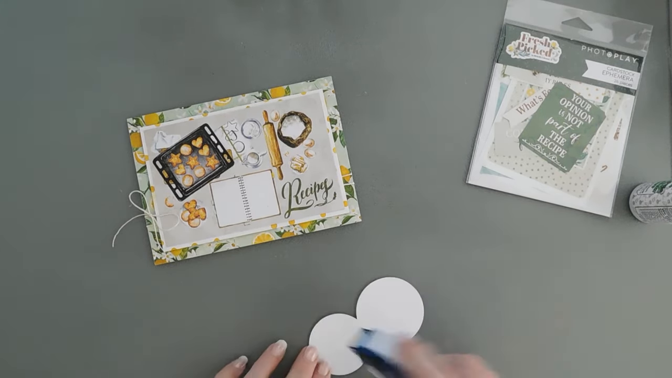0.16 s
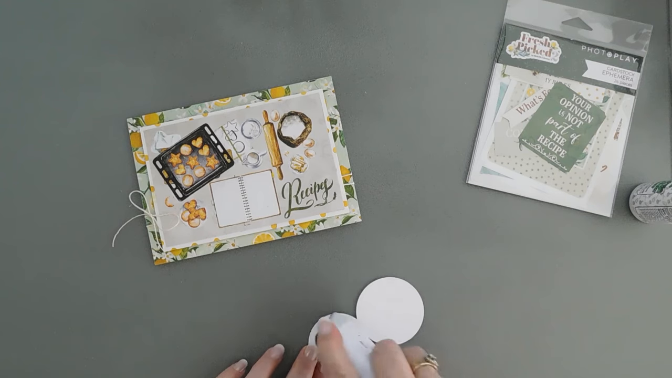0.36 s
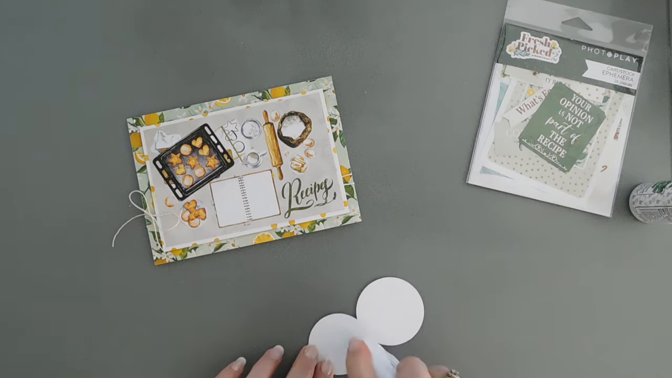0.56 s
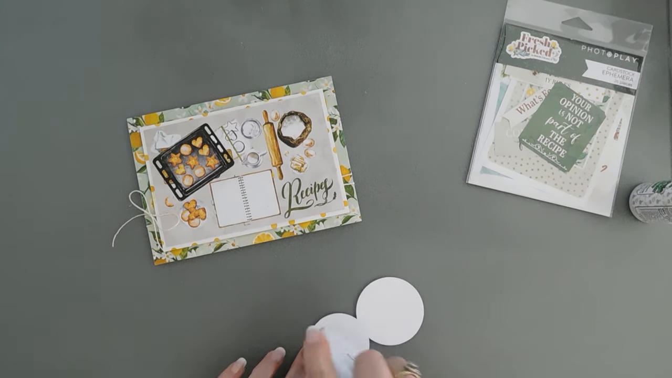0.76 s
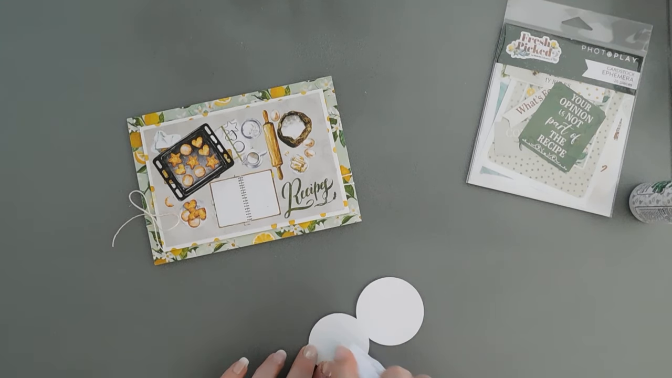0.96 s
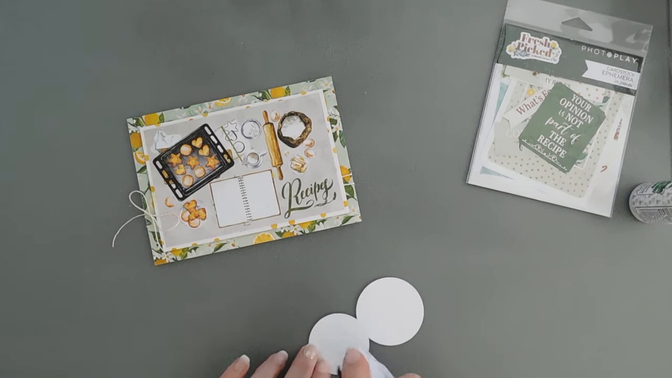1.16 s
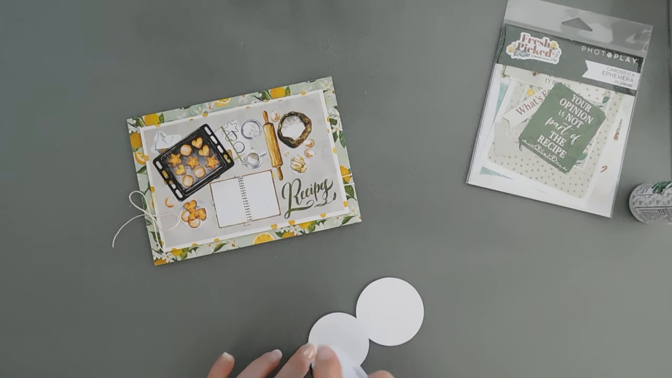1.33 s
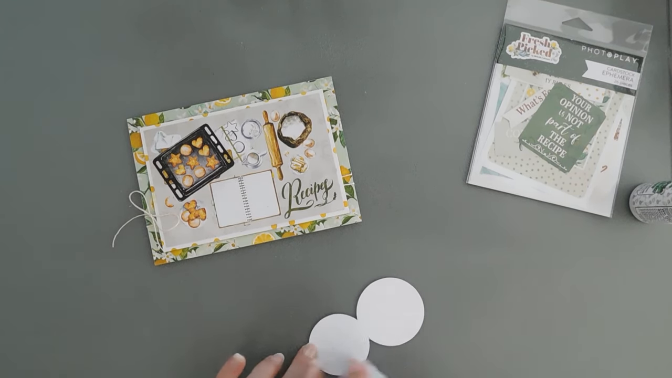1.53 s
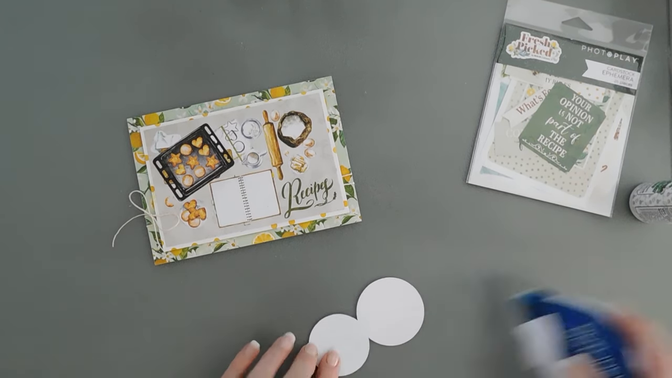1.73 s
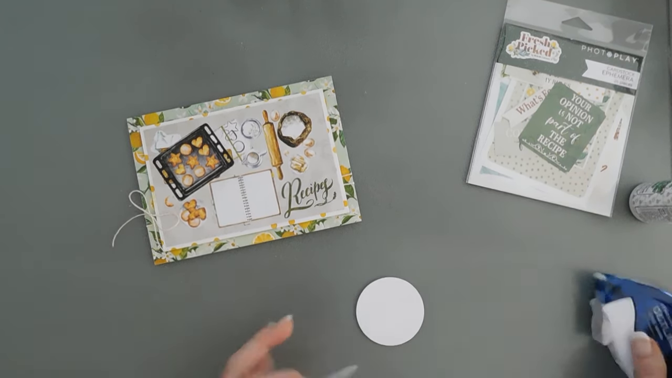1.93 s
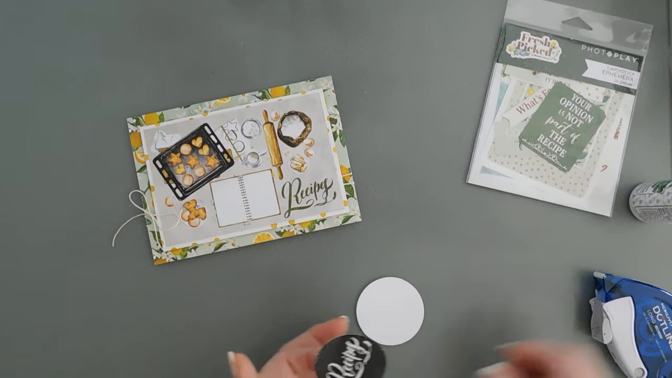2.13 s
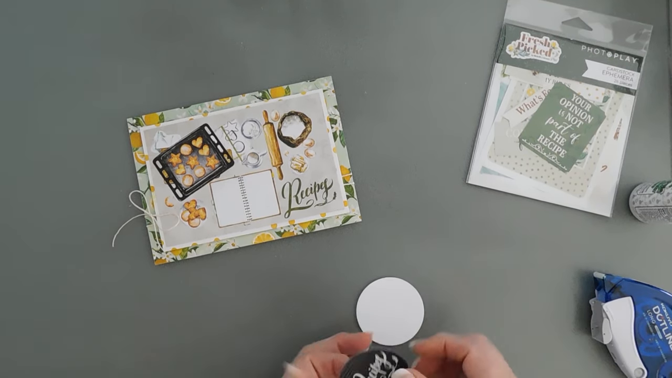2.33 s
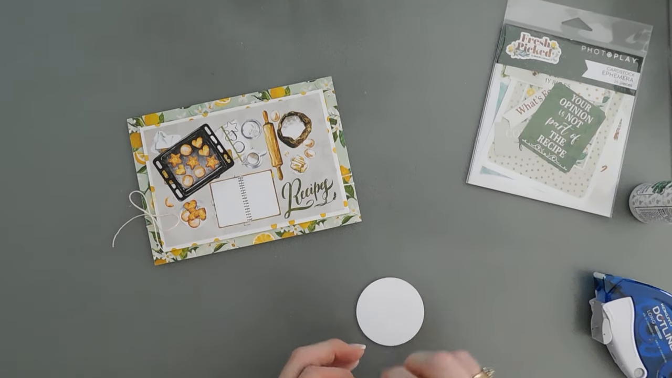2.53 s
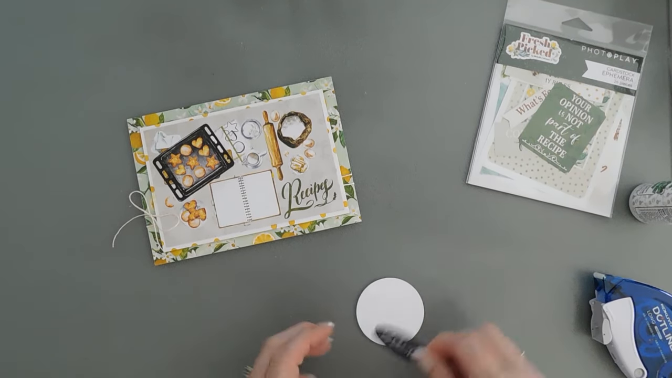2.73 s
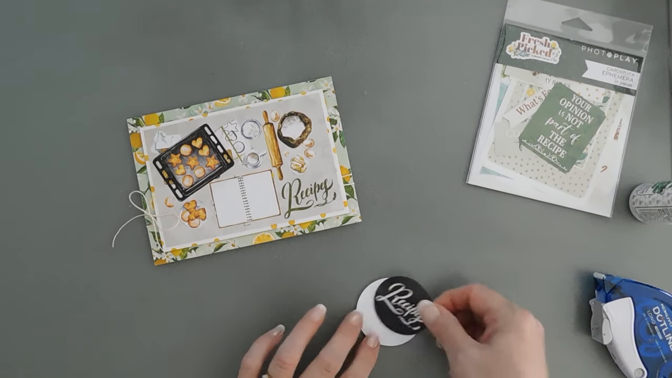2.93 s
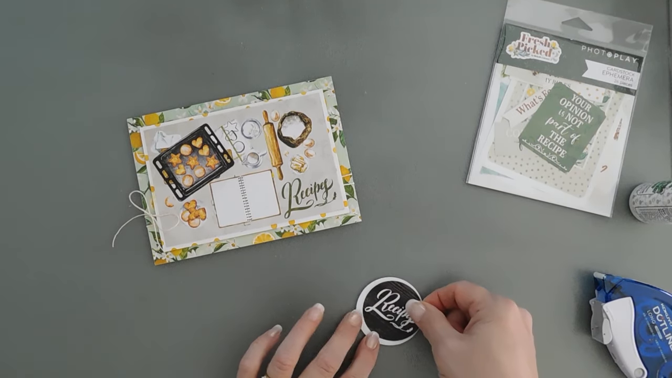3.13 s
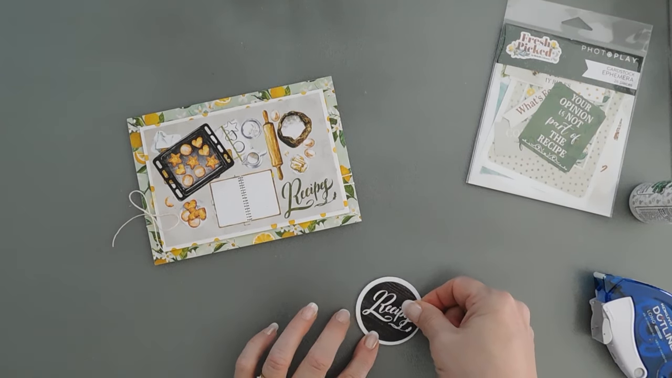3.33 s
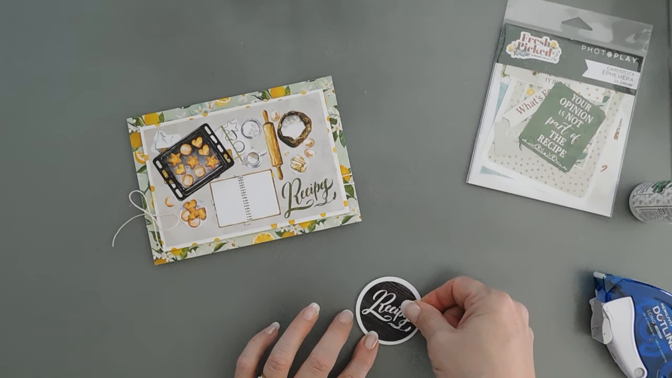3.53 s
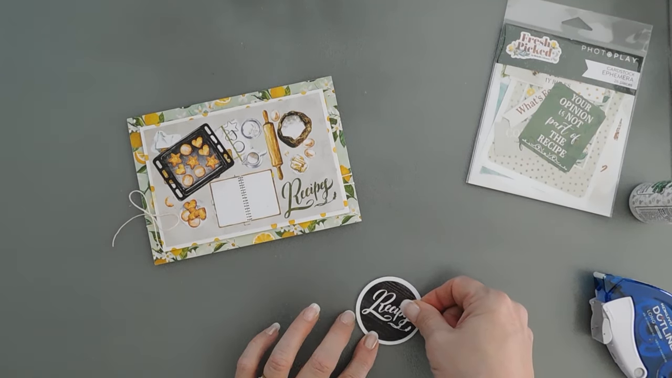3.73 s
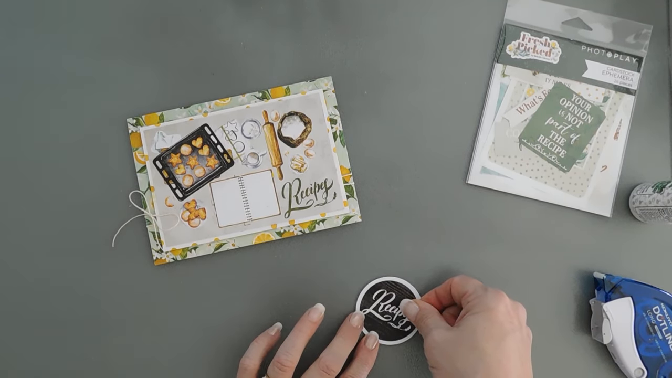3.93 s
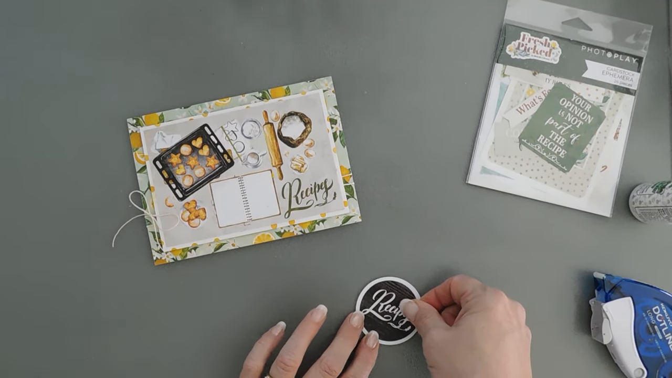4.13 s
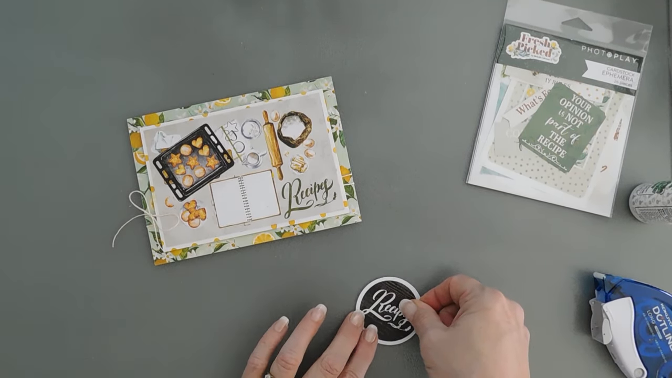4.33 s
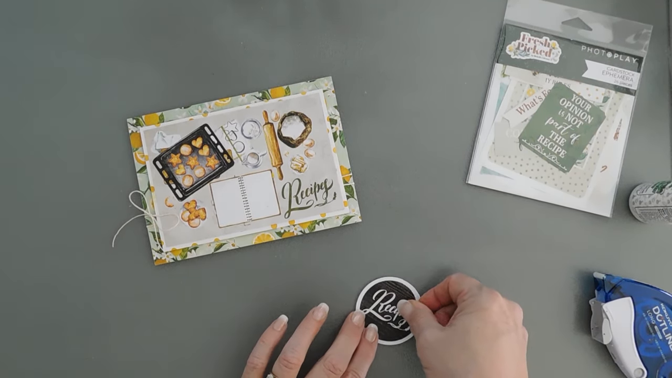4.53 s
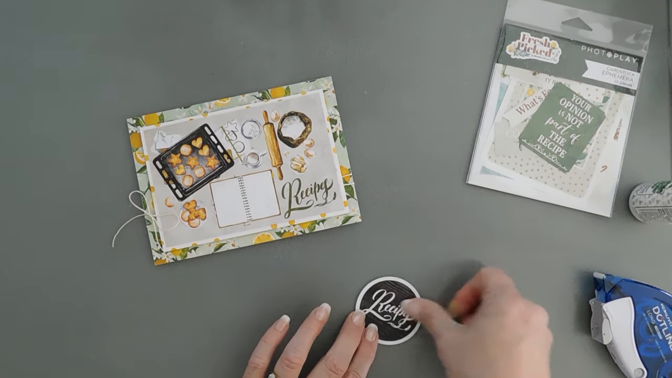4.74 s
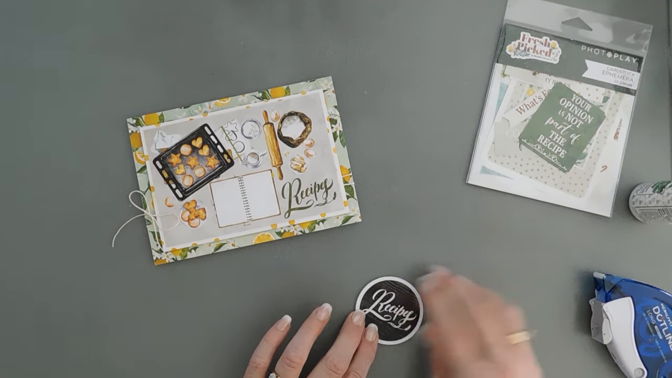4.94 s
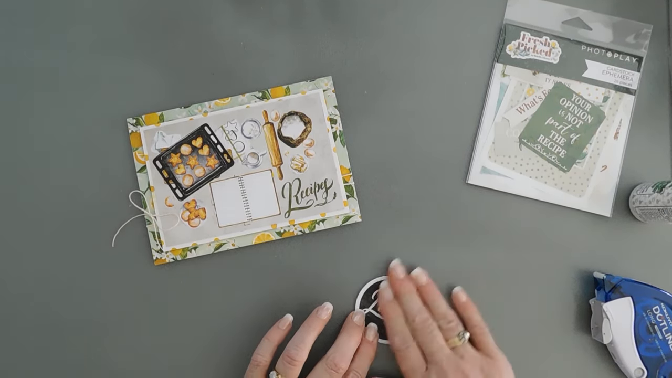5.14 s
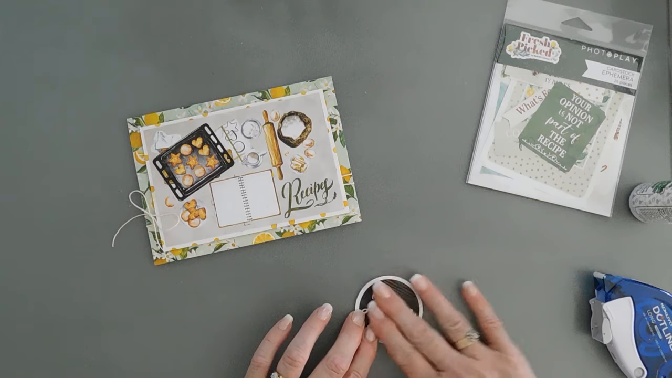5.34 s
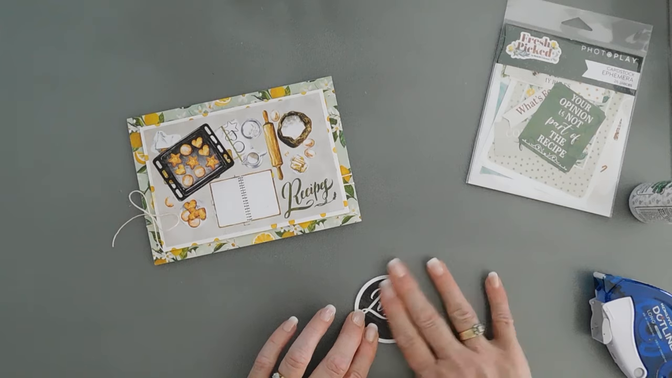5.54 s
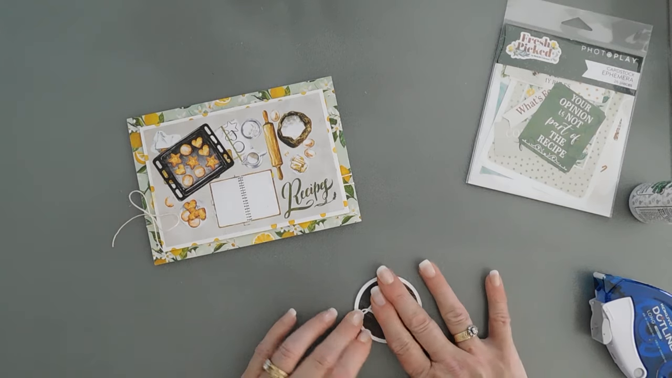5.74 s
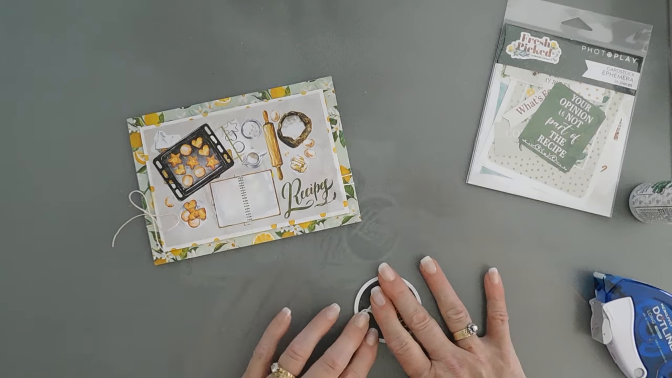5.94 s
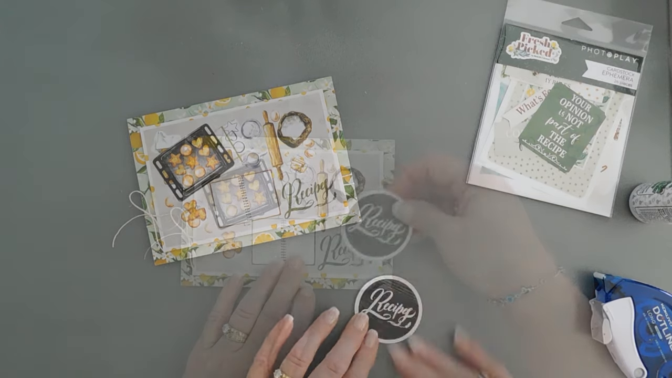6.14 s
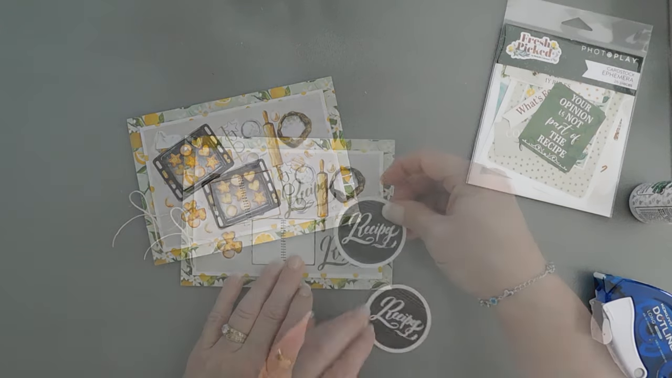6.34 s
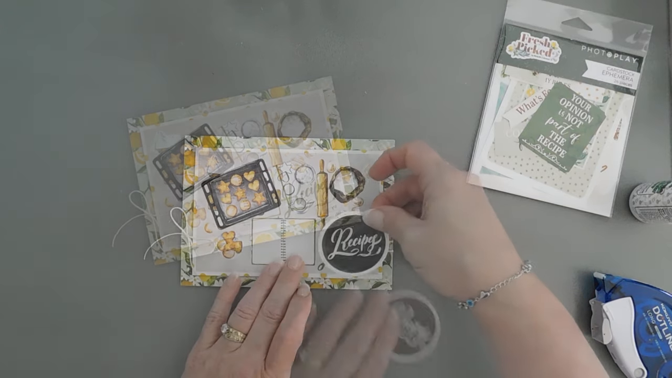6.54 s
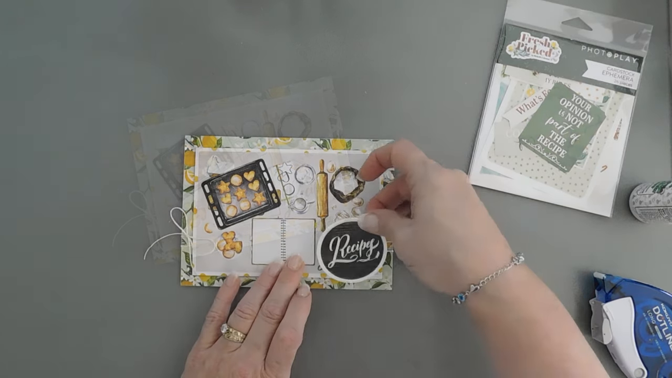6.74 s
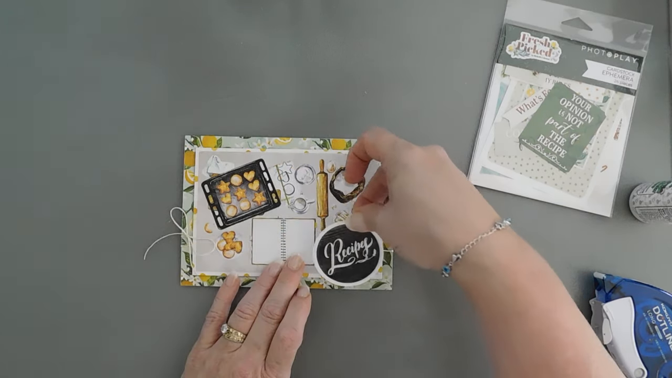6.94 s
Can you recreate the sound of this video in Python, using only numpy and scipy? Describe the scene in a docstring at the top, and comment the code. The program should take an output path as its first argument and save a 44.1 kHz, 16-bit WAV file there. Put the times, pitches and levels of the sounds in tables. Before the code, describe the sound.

Three brief, clicky strokes of an adhesive roller and a sharp knock on a table, followed by faint paper taps and rubbing.

```python
"""Craft table in a small quiet room. A plastic tape runner is picked up, drawn over card in three short
strokes and dropped: knocks ring its shell and thud the table, gears whirr, glue peels off its carrier.
Card pieces are then lifted, tapped, smoothed and laid down: damped taps, slipping fibres, finger squeaks.
Short reflections, air noise and a faint appliance hum lie behind."""
import sys
import numpy as np
from scipy import signal
from scipy.fft import rfft, irfft, next_fast_len
from scipy.io import wavfile
from scipy.ndimage import uniform_filter1d, map_coordinates

SR = 44100
rng = np.random.default_rng(int(sys.argv[2]) if len(sys.argv) > 2 else 0)


def store_wav(level_fs):
    """Save 16-bit WAV to argv[1]."""
    pcm = np.round(np.clip(np.atleast_2d(level_fs), -1, 1) * 32767)
    wavfile.write(sys.argv[1], SR, pcm.T.astype(np.int16))


N = 312777
TIME_S = np.arange(N) / SR
HIT_SAMPLES = 4096

# plastic shell modes: f/Hz, width/Hz, level/dB
SHELL_MODES = [(713, 17, -19.5), (650, 30, -10.5), (833, 73, -0.5), (834, 100, -2), (918, 120, -0.5),
               (1178, 57, 1.5), (1358, 36, -8.5), (1477, 52, -1.5), (1557, 59, -7.5), (1628, 37, -7),
               (1664, 120, -5.5), (1840, 40, -10), (2022, 29, -6), (2175, 90, -1.5), (2208, 150, -1),
               (2553, 130, -7.5), (2725, 140, -7.5), (2850, 120, -10), (3008, 42, -6.5), (3274, 140, -1),
               (3352, 240, -3), (3904, 268, -7.5), (3970, 200, -10), (4580, 620, -16)]
# card sheet spectrum: f/Hz, level/dB
SHEET_SPECTRUM = [(250, -24), (600, -3.5), (1000, -4.5), (1500, 0.5), (2800, -6), (4200, -4.5), (6000, -20),
                  (10000, -37)]
# paper fibre spectrum: f/Hz, level/dB
FIBRE_SPECTRUM = [(1500, -24), (3500, -2), (5000, 3.5), (6500, 3.5), (8500, 6.5), (11500, 7.5), (16000, 3)]


def runner_knocks():
    """Each knock thuds the table once; the shell rebounds twice, weaker and duller each time."""
    # shell and trigger knocks: t/s, ring/dB, ring centre/Hz, snap/dB, thud/dB, loss per rebound/dB
    knocks = [(0.0687, -54, 1890, -45.5, -58, 20), (0.082, -43, 2100, -59, -66, 20),
              (0.1273, -28, 2020, -32, -51.5, 30), (0.2807, -44, 2870, -58.5, -66, 28),
              (0.4134, -28, 1880, -40.5, -43, 5.5), (0.477, -31, 2720, -40, -58, 23),
              (0.505, -33, 1870, -51, -55.5, 25), (0.519, -26, 2830, -25, -59.5, 18),
              (0.6472, -31, 2050, -37, -52.5, 10), (0.853, -32, 2360, -45, -46.5, 2),
              (0.8629, -21, 2730, -29.5, -32.5, 2.5), (0.9105, -22.5, 2980, -30, -58.5, 30),
              (1.131, -44, 3540, -45, -74, 3), (1.1743, -40, 3100, -69, -77, 21),
              (1.4616, -21, 2570, -31, -34, 2), (1.5074, -30.5, 1880, -56, -57.5, 17),
              (1.527, -33, 2980, -41, -67.5, 10.5), (1.692, -49, 2770, -44, -58.5, 5),
              (1.8863, -13.5, 2150, -24.5, -43.5, 8.5), (1.907, -26.5, 1770, -27, -43, 9.5),
              (1.93, -23, 1900, -27.5, -44, 12.5), (1.9764, -20.5, 1800, -31.5, -42.5, 7),
              (2.003, -7.5, 1947, -10, -26.5, 9)]
    # runner position: t/s, left lead/samples, table low cut/Hz
    places = [(0.13, 2.5, 100), (0.4, 2.5, 85), (1.55, -1.5, 85), (1.85, 2.5, 200)]
    rebound_s, dulling_db = .0058, 7
    place_s, leads, low_cuts_hz = np.transpose(places)
    out = np.zeros((2, N))
    for s, ring_db, centre_hz, snap_db, thud_db, loss_db in knocks:
        lead = np.interp(s, place_s, leads)
        thud = from_db(thud_db) * table_thud(length_s=.008, low_cut_hz=np.interp(s, place_s, low_cuts_hz))
        add(out, s, left_leads(pan(thud, balance_db=-2), lead))
        for k in range(3):
            hit = shell_hit(ring_db - k * loss_db, centre_hz, snap_db - k * (loss_db + dulling_db), lead)
            add(out, s + k * rebound_s, left_leads(hit, lead))
    return out


def shell_hit(ring_db, centre_hz, snap_db, lead_samples):
    """Hard plastic contact: a bright snap, and a ring around a pitch set by the spot struck."""
    # plastic snap: f/Hz, level/dB
    snap_spectrum = [(1200, -12), (3000, 0), (4500, 0.5), (6000, 0.5), (8000, -1), (11000, 0),
                     (16000, -11.5)]
    force = contact(length_s=.015, first_push=4.8) + from_db(-8.5) * gear_rattle(per_s=820, t60_s=.05)
    shell = body(force, SHELL_MODES, damping_hz=55, scatter_db=2.5)
    ring = unit_hit(resonate(shell, centre_hz, width_hz=1040))
    snap = pair(lambda: unit_hit(colour(contact(length_s=.012, first_push=1.5), snap_spectrum)), alike=1)
    snap_balance_db = 1.2 * lead_samples - 3.5  # treble shifts toward the leading side
    return pan(from_db(ring_db) * ring, balance_db=-3.3) + pan(from_db(snap_db) * snap, snap_balance_db)


def gear_rattle(per_s, t60_s):
    """Loose gears chatter after a knock; about unit energy."""
    clicks = (rng.random(HIT_SAMPLES) < per_s / SR) * rng.standard_normal(HIT_SAMPLES)
    fade = 1000 ** (-TIME_S[:HIT_SAMPLES] / t60_s)
    return clicks * fade / np.sqrt(np.sum(fade ** 2) * per_s / SR)


def tape_strokes():
    """Spool gears rattle the shell; glue tears off its carrier in tiny snaps."""
    # gear drive on the shell: f/Hz, level/dB
    gear_spectrum = [(200, 11), (800, -8), (1200, -3), (2100, 1.5), (3200, 7), (5000, -5)]
    # tearing glue: f/Hz, level/dB
    peel_spectrum = [(1500, -10.5), (3500, -1), (5000, 2), (6500, -0.5), (9000, -1), (12000, -1.5),
                     (16000, -4.5)]
    peel_db, peel_lag_s = -1.76, .006  # relative to the gears; the tape must be taut first

    def driven_shell():
        return unit_rms(body(grains(per_s=800, spread_db=4), SHELL_MODES, damping_hz=15, scatter_db=1))

    gears = unit_rms(colour(pair(driven_shell, alike=.85), gear_spectrum))
    glue = pair(lambda: unit_rms(colour(grains(per_s=3000, spread_db=4.5), peel_spectrum)), alike=.7)
    whirr = spool_drive(TIME_S) * gears
    peel = from_db(peel_db) * spool_drive(TIME_S - peel_lag_s) * glue
    return pan(whirr, balance_db=-4) + pan(peel, balance_db=-2)


def spool_drive(t_s):
    """Spool gain: each stroke runs up, holds and runs down."""
    # strokes: full speed t/s, run-up/s, hold/s, run-down/s, whirr/dB
    strokes = [(0.518, 0.064, 0.087, 0.1, -37.5), (0.942, 0.17, 0.06, 0.21, -40),
               (1.521, .11, 0.012, 0.043, -38)]
    ramp_db = 32
    drive = 0
    for s, up_s, hold_s, down_s, level_db in strokes:
        slack = np.maximum(s - t_s, 0) / up_s + np.maximum(t_s - s - hold_s, 0) / down_s
        drive += from_db(level_db - ramp_db * np.minimum(slack, 10))
    return drive


def card_taps():
    """Heavily damped card: one broad resonance and a crisp edge; long contacts swell as it settles."""
    # card edges and fingernails: t/s, ring/dB, ring centre/Hz, snap/dB, thud/dB, contact/s
    taps = [(2.582, -51, 2370, -59.5, -80, 0.014), (2.657, -39.5, 2490, -48.5, -65, 0.009),
            (2.7095, -31.5, 2050, -40.5, -54, 0.012), (3.0105, -53, 2650, -46, -88, 0.005),
            (3.126, -57, 2170, -59.5, -81, 0.002), (4.383, -65, 1550, -58.5, -73, .004),
            (4.581, -68.5, 2960, -59.5, -82.5, 0.024), (4.684, -33.5, 3613, -44, -69, 0.015),
            (4.694, -40, 2350, -37, -60, 0.0052), (5.054, -48.5, 2150, -45, -59, .012),
            (5.797, -53.5, 2210, -60, -87, 0.0053), (5.924, -34, 2800, -28.5, -47, 0.00097),
            (6.1555, -63, 2600, -45, -80, .002), (6.1686, -42, 2260, -38.5, -72, 0.0021),
            (6.21, -47.5, 2600, -52.5, -81, 0.014), (6.2505, -31, 3000, -31, -75, 0.045),
            (6.2875, -31.5, 1700, -42, -69, 0.038)]
    out = np.zeros((2, N))
    for s, ring_db, centre_hz, snap_db, thud_db, length_s in taps:
        settle = np.minimum((TIME_S[:HIT_SAMPLES] + 1 / SR) / (.27 * length_s), 1)

        def edge():
            force = whiten(settle * contact(length_s, first_push=3.7))
            return unit_hit(colour(force, FIBRE_SPECTRUM))

        sheet = colour(settle * contact(length_s, first_push=2.4), SHEET_SPECTRUM)
        ring = from_db(ring_db) * unit_hit(resonate(sheet, centre_hz, width_hz=2100))
        snap = from_db(snap_db) * pair(edge, alike=.9)
        thud = from_db(thud_db) * table_thud(length_s=.0085, low_cut_hz=85)
        add(out, s, pan(ring + thud, balance_db=-4.5) + pan(snap, balance_db=-2))
    return out


def finger_slips():
    """Skin slides on card, or on the runner as the hand lifts it, and excites one resonance, swelling and
    fading."""
    # brushes and squeaks: centre t/s, level/dB, f/Hz, width/Hz, length/s
    slips = [(0.024, -53.5, 1590, 1500, 0.052), (2.342, -58, 1480, 1360, 0.51),
             (3.042, -50.5, 3436, 1208, 0.065), (3.368, -72, 5650, 1300, .16),
             (4.686, -39.5, 4350, 1090, 0.0089), (4.961, -50.5, 1260, 895, 0.023),
             (4.984, -48, 1150, 800, 0.027), (5.297, -51.5, 2850, 713, 0.072),
             (5.618, -44, 3860, 1008, 0.0089), (6.182, -54, 1290, 1400, 0.076)]
    out = np.zeros((2, N))
    for s, level_db, hz, width_hz, length_s in slips:
        swell = signal.windows.hann(int(length_s * SR) + 3)
        friction = rng.standard_normal(len(swell))
        slip = resonate(resonate(friction, hz, width_hz), hz, width_hz)
        add(out, s - length_s / 2, pan(from_db(level_db) * unit_hit(swell * slip), balance_db=-4.5))
    return out


def card_rubs():
    """Paper fibres catch and slip, louder with speed; the sheet radiates the lower part."""
    # fingers and card sliding on card: fastest t/s, length/s, rustle/dB, hiss/dB
    rubs = [(0.21, 0.13, -60, -68), (1.24, .025, -74, -66), (1.318, 0.049, -66, -68),
            (2.71, 0.045, -53, -58), (3.04, 0.05, -59, -52.5), (4.675, .09, -64.5, -64),
            (4.8, 0.033, -68, -62.5), (4.974, .05, -55.5, -62), (5.077, 0.09, -64, -69),
            (5.198, 0.11, -57, -59), (5.308, 0.038, -58, -52.5), (5.372, 0.11, -68, -63),
            (5.461, 0.081, -65, -54.5), (5.606, 0.082, -65, -55.5), (5.7, .06, -69, -69),
            (6.086, .11, -64, -59.5), (6.16, 0.073, -60.5, -53.5), (6.188, 0.041, -56, -67),
            (6.293, 0.1, -49.5, -56)]
    rise_share = .59
    rustle = hiss = 0
    for s, length_s, rustle_db, hiss_db in rubs:
        from_peak = np.maximum((s - TIME_S) / rise_share, (TIME_S - s) / (1 - rise_share)) / length_s
        speed = np.exp(-np.minimum(from_peak, 10) ** 2)
        rustle += from_db(rustle_db) * speed
        hiss += from_db(hiss_db) * speed
    sheet = pair(lambda: unit_rms(colour(grains(per_s=11000, spread_db=4), SHEET_SPECTRUM)), alike=.79)
    fibres = pair(lambda: unit_rms(colour(grains(per_s=37000, spread_db=3.5), FIBRE_SPECTRUM)), alike=.63)
    return pan(rustle * sheet, balance_db=-3) + pan(hiss * fibres, balance_db=-1)


def table_thud(length_s, low_cut_hz):
    """A blow rings the table's low modes; a stiff spot gives less bass."""
    # table top modes: f/Hz, width/Hz, level/dB
    table_modes = [(59, 20, -3), (108, 11, 1.5), (163.4, 3.4, 1), (213.4, 53.6, 0.5), (275, 54, -0.5),
                   (354.9, 37.3, 1), (440, 34, -6.5), (600, 130, -5)]
    top = body(contact(length_s, first_push=25), table_modes, damping_hz=9, scatter_db=3)
    highpass = signal.butter(2, low_cut_hz, "high", fs=SR, output="sos")
    return unit_hit(signal.sosfilt(highpass, top))


def reflections(x, first_echo_s):
    """Table and walls return a short tail that dies band by band."""
    # tail bands: f/Hz, level/dB
    bands = [(100, -3.5), (300, -7.5), (600, -0.5), (1100, -1), (2200, -6.5), (4000, -5.5), (8000, -4),
             (16000, -6)]
    # tail decay: f/Hz, T60/s
    decay_times = [(200, .3), (600, .25), (2000, .24), (5000, .26), (16000, .22)]
    size = SR // 2
    t_s, hz = TIME_S[:size], np.fft.rfftfreq(size, 1 / SR)
    noise = rfft(diffuse_noise(size))
    response = 0
    for centre_hz, level_db in bands:
        band_weight = at_hz([(band_hz, band_hz == centre_hz) for band_hz, _ in bands], hz)
        decay = (t_s > first_echo_s) * 1000 ** (-t_s / at_hz(decay_times, centre_hz))
        response += from_db(level_db) * unit_rms(decay) / np.sqrt(size) * irfft(noise * band_weight, size)
    return signal.fftconvolve(x, response, axes=1)[:, :N]


def room_tone():
    """Steady air noise and faint appliance hum."""
    # air noise: f/Hz, level/dB
    air_spectrum = [(12, -27), (20, -1.5), (63, -7), (86, -16.5), (117, -14), (230, -12), (258, -12),
                    (351, -9), (382, -15.5), (416, -10.5), (1020, -14), (1180, -10), (5070, -27.5),
                    (15200, -36.5), (16500, -57)]
    # hum tones: f/Hz, level/dB
    tones = [(120, -79.5), (236, -80), (355, -75)]
    air = from_db(-59.5) * unit_rms(colour(diffuse_noise(N), air_spectrum))
    hum = sum(from_db(db) * np.sqrt(2) * np.sin(2 * np.pi * (hz * TIME_S + rng.random()))
              for hz, db in tones)
    return pan(air + hum, balance_db=-2)


def diffuse_noise(size):
    """White noise from all sides, unrelated between channels in the treble."""
    # diffuse field: f/Hz, channel correlation
    correlation = [(30, 0.25), (200, .85), (500, 0.37), (1000, 0.37), (2000, 0.51), (4000, 0), (16000, 0)]
    padded = 2 * next_fast_len(size // 2 + 1)
    alike = at_hz(correlation, np.fft.rfftfreq(padded, 1 / SR))
    mid, side = rfft(rng.standard_normal((2, padded)))
    return irfft(mid_side(mid, side, alike))[:, :size]


def contact(length_s, first_push):
    """Touch force: a push, then micro-slips dying within the contact length."""
    fade = 1000 ** (-TIME_S[:HIT_SAMPLES] / length_s)
    force = rng.standard_normal(HIT_SAMPLES) * fade
    force[0] = first_push
    return whiten(force) * np.sqrt(fade)


def grains(per_s, spread_db):
    """Random tiny slips of uneven size; unit rms."""
    sizes = from_db(spread_db * np.minimum(rng.exponential(1, N), 4)) * rng.choice([-1, 1], N)
    return unit_rms(sizes * (rng.random(N) < per_s / SR))


def body(force, modes, damping_hz, scatter_db):
    """Parallel hand-damped modes; their strengths vary with the contact point."""
    strengths = from_db(rng.normal(0, scatter_db, len(modes)))
    return sum((-1) ** k * strengths[k] * from_db(db) * resonate(force, hz, width_hz + damping_hz)
               for k, (hz, width_hz, db) in enumerate(modes))


def resonate(x, hz, width_hz):
    """One resonance, unit peak gain."""
    radius = np.exp(-np.pi * width_hz / SR)
    feedforward = np.array([1, 0, -1]) * (1 - radius ** 2) / 2
    feedback = [1, -2 * radius * np.cos(2 * np.pi * hz / SR), radius ** 2]
    return signal.lfilter(feedforward, feedback, x + 1e-18)


def colour(x, spectrum):
    """Minimum-phase filter from (f/Hz, level/dB) points."""
    gain = from_db(at_hz(spectrum, np.fft.rfftfreq(2 * HIT_SAMPLES, 1 / SR)))
    cepstrum = irfft(np.log(gain))
    cepstrum[1:HIT_SAMPLES] *= 2
    cepstrum[HIT_SAMPLES + 1:] = 0
    response = irfft(np.exp(rfft(cepstrum)))[:HIT_SAMPLES]
    return signal.oaconvolve(x, np.array(response, ndmin=x.ndim), axes=-1)[..., :x.shape[-1]]


def whiten(force):
    """Flatten the spectrum of a short force."""
    spectrum = rfft(force, 2 * HIT_SAMPLES)
    return irfft(spectrum / (np.abs(spectrum) + 1e-9))[:HIT_SAMPLES]


def pair(make, alike):
    """Stereo from two draws of a sound."""
    return mid_side(make(), make(), alike)


def mid_side(mid, side, alike):
    """Two channels with correlation `alike`."""
    return np.sqrt((1 + alike) / 2) * mid + np.sqrt((1 - alike) / 2) * side * [[1], [-1]]


def pan(x, balance_db):
    """Constant-power pan; positive is left."""
    return x * unit_rms(from_db(np.array([[balance_db], [-balance_db]]) / 2))


def left_leads(x, lead_samples):
    """Delay the far channel; a negative lead delays the left."""
    return np.array([map_coordinates(channel, [np.arange(len(channel)) - max(delay, 0)], order=5)
                     for channel, delay in zip(x, (-lead_samples, lead_samples))])


def add(out, start_s, sound):
    start = max(int(start_s * SR), 0)
    out[:, start:start + sound.shape[-1]] += sound[:, :N - start]


def at_hz(points, hz):
    """Interpolate (f/Hz, value) points over log frequency."""
    points_hz, values = np.array(points, float).T
    return np.interp(np.log(np.maximum(hz, 1)), np.log(points_hz), values)


def unit_hit(x):
    """Scale the loudest 5 ms to unit rms."""
    return x / np.sqrt(uniform_filter1d(x ** 2, int(.005 * SR)).max() + 1e-20)


def unit_rms(x):
    return x / np.sqrt(np.mean(x ** 2) + 1e-20)


def from_db(db):
    return 10 ** (np.asarray(db) / 20)


def scene():
    """Runner, card, their reflections and the room tone."""
    runner_send_db, card_send_db = .4, -.8
    runner = runner_knocks() + tape_strokes()
    card = card_taps() + finger_slips() + card_rubs()
    to_walls = from_db(runner_send_db) * runner + from_db(card_send_db) * card
    return runner + card + reflections(to_walls, first_echo_s=.0025) + room_tone()


def record(dry):
    """Soft peak limit, then a steep low-pass."""
    ceiling, cutoff_hz = .92, 16100
    limited = dry / (1 + (dry / ceiling) ** 4) ** .25
    lowpass = signal.ellip(10, .1, 90, cutoff_hz, fs=SR, output="sos")
    return signal.sosfilt(lowpass, limited)


dry = scene()
out = record(dry)
store_wav(out)
```